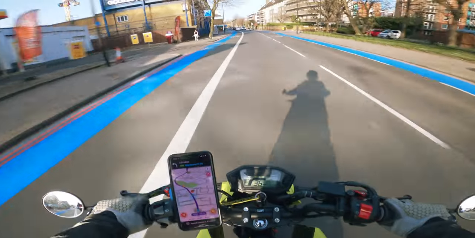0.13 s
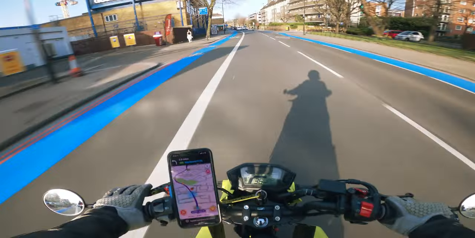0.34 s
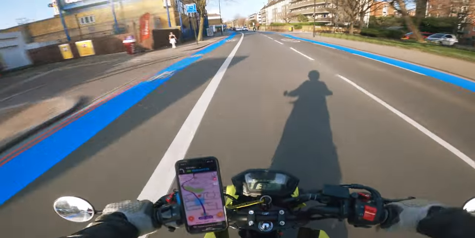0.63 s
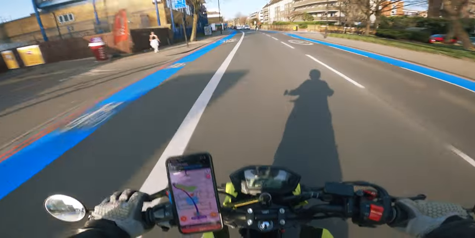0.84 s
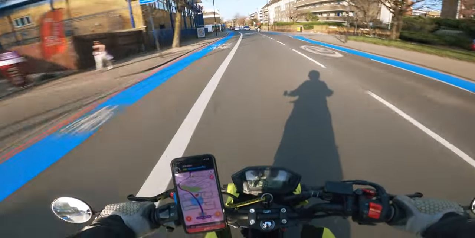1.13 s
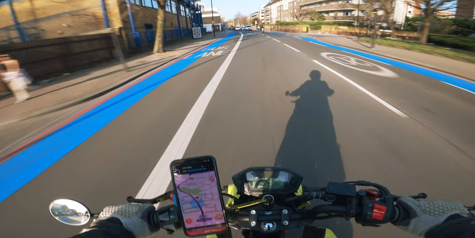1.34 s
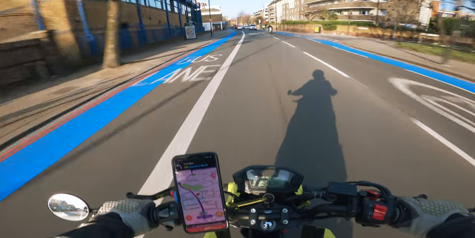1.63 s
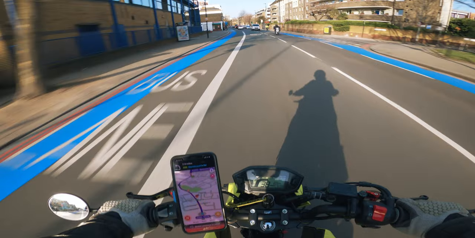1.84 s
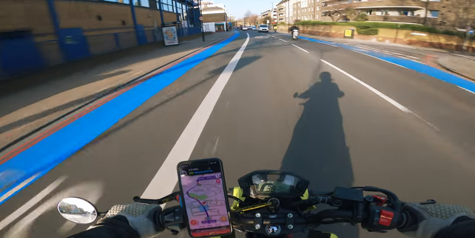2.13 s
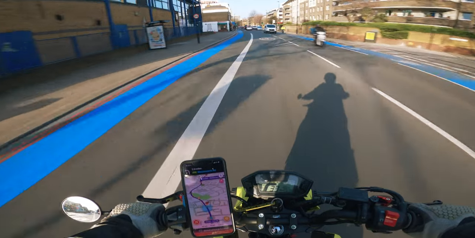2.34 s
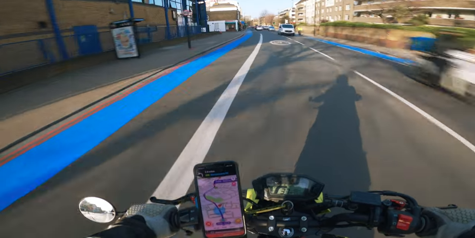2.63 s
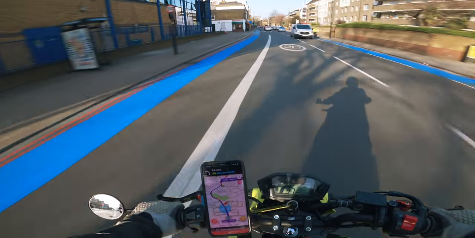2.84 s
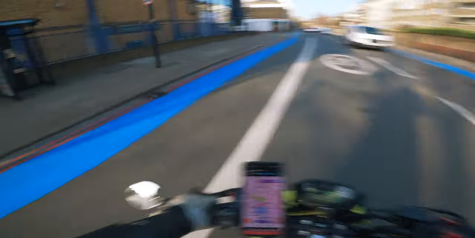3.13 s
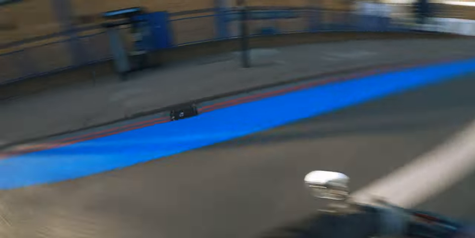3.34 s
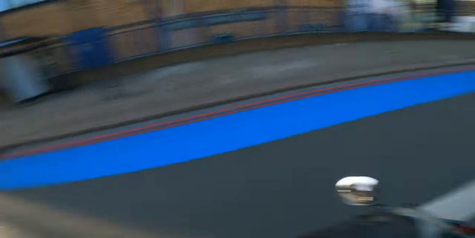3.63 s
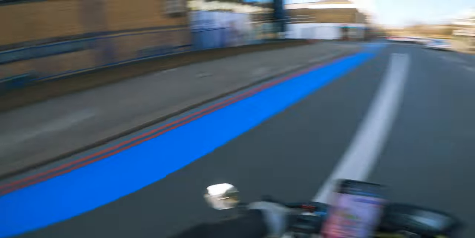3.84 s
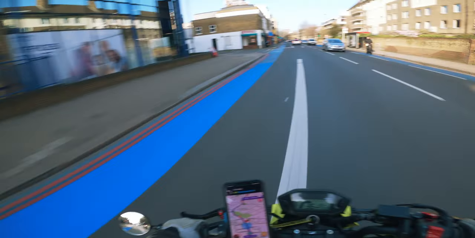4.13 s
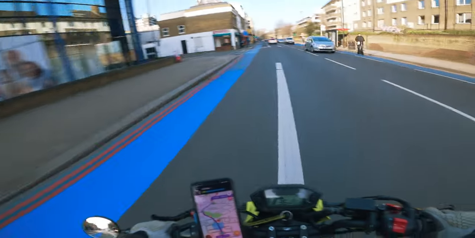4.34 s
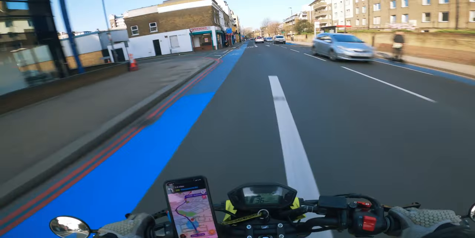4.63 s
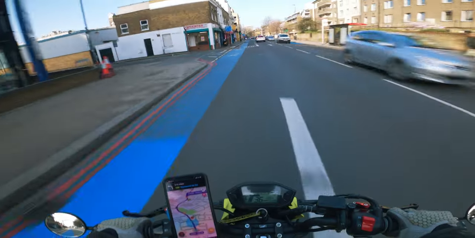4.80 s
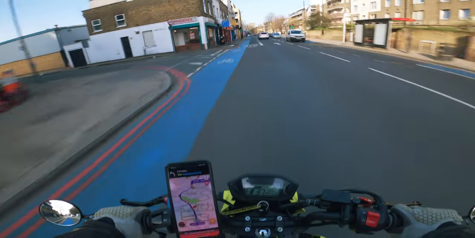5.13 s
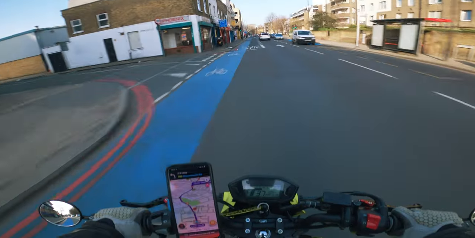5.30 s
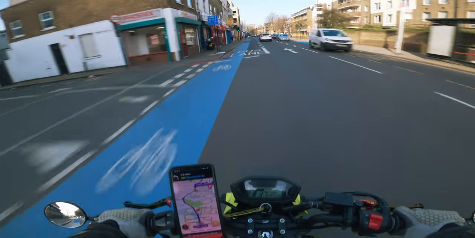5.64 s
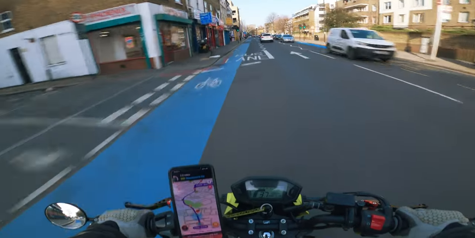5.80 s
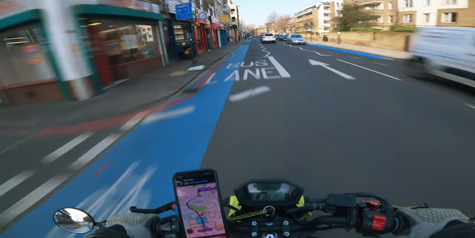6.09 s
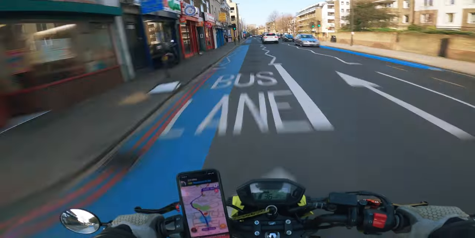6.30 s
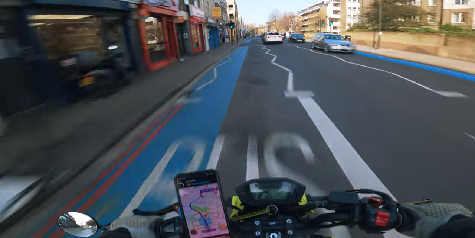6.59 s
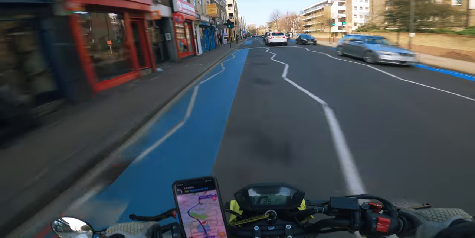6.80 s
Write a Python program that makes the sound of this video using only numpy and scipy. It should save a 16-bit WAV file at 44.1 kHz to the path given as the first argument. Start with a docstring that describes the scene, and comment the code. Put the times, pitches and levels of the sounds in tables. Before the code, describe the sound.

A small single-cylinder motorcycle barks at full throttle, changes up early, then burbles along a city street, softening into hollow thuds whenever the throttle closes.

```python
"""Small motorcycle from the saddle

A single-cylinder engine on a city street: each cycle barks with the throttle open and thuds, a little
later, with it shut; a gear change comes early. Barks and thuds are filtered pulses, gas is gated noise,
and metal ticks ring under load. A fainter, slower drone is a stack of tones; road and traffic hiss and
rumble are coloured noise, with brief squeaks and a faint whine. Two close microphone ports hear it."""
import sys
import numpy as np
from scipy import signal
from scipy.fft import rfft, irfft, next_fast_len
from scipy.io import wavfile
from scipy.ndimage import map_coordinates

SR = 44100
rng = np.random.default_rng(int(sys.argv[2]) if len(sys.argv) > 2 else 0)


def inscribe(sig):
    """Save sig as 16-bit PCM at rate SR to the path in sys.argv[1].

    A 1-D sig is mono; a 2-D sig holds one channel per row.
    Samples are clipped to [-1, 1] before scaling.
    """
    pcm = np.round(np.clip(np.atleast_2d(sig).T, -1, 1) * 32767)
    wavfile.write(sys.argv[1], SR, pcm.astype(np.int16))


N = 306936
TIME = np.arange(N) / SR
PULSE_SAMPLES = 4096
THUD_DELAY_S = .0036  # thud after bark

# Engine speed: start_s, cycle_rate_hz
ENGINE_SPEED = [(0.0, 56.56), (0.44, 59.3), (0.58, 54.52), (0.7, 53.47), (0.82, 43.98), (1.45, 45.14),
                (1.7, 45.36), (2.05, 44.87), (2.25, 43.18), (2.35, 44.12), (3.4, 41.23), (3.5, 42.71),
                (3.7, 41.5), (5.0, 42.99), (5.7, 43.27), (6.4, 42.11), (6.5, 41.04), (6.96, 41.25)]
# Engine load, 1 full throttle, 0 neutral, below 0 engine braking: start_s, load
ENGINE_LOAD = [(0, 1), (.43, .88), (.48, 0.2), (.51, -1), (.6, -.68), (.66, -0.94), (.7, 0.33), (.73, 0.54),
               (.81, 0.52), (.87, 0.55), (1.56, 0.57), (1.75, 0.3), (1.95, 0.13), (2.06, -0.24),
               (2.26, -0.32), (2.35, -0.44), (2.7, -0.44), (3.4, -0.47), (3.46, -.24), (3.6, 0.093),
               (3.76, 0.27), (3.85, 0.4), (4.2, 0.46), (5.45, .38), (5.8, 0.21), (5.93, -0.17),
               (6.46, -0.18), (6.53, -0.45), (6.67, -0.65), (6.8, -.46), (6.88, -0.57)]
# What follows the load: load, boom_db, rasp_db, rasp_t60_s, crack_db, hiss_db, rumble_db
LOAD_EFFECTS = [(-0.92, -6.5, -70, .018, -83, -45, -38), (-0.48, 1, -65.5, 0.0096, -85, -51.5, -45),
                (-0.047, 8, -73.5, 0.011, -90.5, -53, -45), (0.15, 6, -71.5, 0.016, -85, -51.5, -42.5),
                (0.17, -8.5, -72.5, 0.0097, -84.5, -51, -40), (.42, -0.5, -64.5, 0.006, -76.5, -50.5, -40),
                (.58, 2, -64.5, 0.0096, -74, -50, -39), (0.98, -1.5, -50.5, 0.021, -64.5, -42.5, -39)]


def amp(db):
    """Amplitude factor for a level in dB."""
    return 10 ** (np.asarray(db) / 20)


def unit(x):
    """Scale a signal to rms 1."""
    return x / np.sqrt(np.mean(x ** 2) + 1e-20)


def along(points, hz):
    """Read (Hz, value) points on a log frequency axis."""
    f, v = np.transpose(points)
    return np.interp(np.log(hz + 1), np.log(f + 1), v)


def curves(rows, positions):
    """Read each column after the first, which holds the times or loads, at the given positions."""
    knots, *columns = np.transpose(rows)
    return [np.interp(positions, knots, column) for column in columns]


def filtered(x, response):
    """Multiply the spectrum of x by a complex response of frequency."""
    length = next_fast_len(N + 8192)
    return irfft(rfft(x, length) * response(np.fft.rfftfreq(length, 1 / SR)), length)[..., :N]


def noise(spectrum, alike, envelope=1):
    """Stereo noise, gated and then coloured, rms 1; alike is the correlation of the two sides."""
    a, b = rng.standard_normal((2, N)) * envelope
    turn = np.arccos(np.clip(alike, 0, 1)) / 2
    common, opposed = np.cos(turn) * a, np.sin(turn) * b
    pair = np.array([common + opposed, common - opposed])
    return unit(filtered(pair, lambda hz: amp(along(spectrum, hz))))


def wander(rate_hz):
    """A smooth random curve through about rate_hz new values a second."""
    return map_coordinates(rng.standard_normal(200), [TIME * rate_hz])


def engine():
    """Combustion pulses and metal ticks, with the gas that leaves at each firing."""
    times = firings(jitter_s=.00005)
    pulses = thuds(times, size_db=.45, colour_db=.4, later_s=THUD_DELAY_S)
    return pulses + ticks(times) + gas(times)


def firings(jitter_s):
    """Times at which the crank completes a four-stroke cycle, each a little early or late."""
    cycles = np.cumsum(curves(ENGINE_SPEED, TIME)[0]) / SR + .056
    times = np.interp(np.arange(1, int(cycles[-1]) + 1), cycles, TIME)
    return np.clip(times + jitter_s * rng.standard_normal(400)[:len(times)], 0, TIME[-1])


def thuds(times, size_db, colour_db, later_s):
    """Bark and thud are two pressure pulses a cycle; the load decides which one is heard."""
    # Relative spectra of the shut-throttle thud, cruising bark and full-load bark: pitch_hz, level_db
    shut_spectrum = [(43, -37.5), (128, 1.5), (298, -9), (426, -16.5), (468, -24), (553, -21), (639, -51),
                     (681, -28.5), (809, -31), (851, -33.5), (936, -46.5), (1022, -38.5), (1362, -62),
                     (2500, -98.5)]
    cruise_spectrum = [(43, -23.5), (128, 0), (171, 1), (299, -7.5), (426, -1.5), (554, -11), (640, -27),
                       (725, -18), (768, -33), (853, -27), (938, -38), (1066, -29.5), (1365, -56),
                       (2500, -89)]
    full_spectrum = [(58, -17), (117, -1.5), (291, -7), (408, -3.5), (524, -7.5), (641, -18.5),
                     (874, -18.5), (932, -25), (990, -20), (1165, -22.5), (1223, -25), (1340, -36),
                     (1398, -45.5), (2500, -91.5)]
    # Gain of the thud's upper harmonics: start_s, level_db
    upper_gain = [(.5, 1.5), (.7, 1.5), (2.05, -5.5), (2.35, 2.5), (3.4, -0.5), (3.55, -4.5), (5.9, -4.5),
                  (6.5, -6), (6.96, -4.5)]
    upper_from_hz = 328
    boom_hz, boom_octaves = 125.8, 0.092
    cruise_load, full_load = 0.43, .85  # the bark changes from cruising to full load between these

    hz = np.fft.rfftfreq(PULSE_SAMPLES, 1 / SR)
    load = curves(ENGINE_LOAD, times)[0][:, None]
    boom = curves(LOAD_EFFECTS, load)[0] * np.exp(-(np.log2((hz + 1) / boom_hz) / boom_octaves) ** 2)
    fullness = np.clip((load - cruise_load) / (full_load - cruise_load), 0, 1)
    bark = (1 - fullness) * along(cruise_spectrum, hz) + fullness * along(full_spectrum, hz)
    upper = curves(upper_gain, times)[0][:, None] / (1 + (upper_from_hz / (hz + 1)) ** 10)
    thud = along(shut_spectrum, hz) + upper

    # Random colour is drawn every third of an octave
    bands = np.clip(3 * np.log2((hz + 1) / 60), 0, 14)
    knots = np.meshgrid(np.arange(len(times)), bands, indexing="ij")
    spectrum = 0
    for db, gain, delay in zip([bark, thud], bark_thud_gains(load), [0, later_s]):
        db = db - 10 * np.log10(np.sum(amp(db) ** 2, 1, keepdims=True))
        chance = rng.standard_normal((400, 16))[:len(times)]
        scatter_db = colour_db * map_coordinates(chance, knots, order=1)
        scatter_db = scatter_db + size_db * chance[:, -1:]  # no two burns alike
        delayed = causal(db + boom) * np.exp(-2j * np.pi * hz * delay)
        spectrum = spectrum + gain * amp(scatter_db) * delayed

    # Equal power at any engine speed
    energy = np.sqrt(SR * PULSE_SAMPLES / curves(ENGINE_SPEED, times)[0] / 2)
    start = np.floor(times * SR).astype(int)
    shift = np.exp(-2j * np.pi * hz * (times - start / SR)[:, None])  # the part of a sample left over
    pulses = -energy[:, None] * irfft(spectrum * shift)  # suction comes first
    sample = np.arange(PULSE_SAMPLES)
    fade_out = signal.windows.tukey(PULSE_SAMPLES, .5).clip(sample < PULSE_SAMPLES / 2)
    pulses = pulses * fade_out * np.clip(sample / 12, 0, 1)  # each rises softly and dies away fully
    return np.bincount((start[:, None] + sample).ravel(), pulses.ravel(), N + PULSE_SAMPLES)[:N]


def bark_thud_gains(load):
    """Gains of bark and thud: the positive and negative part of the load, rounded near zero."""
    full_db, overlap = -18, 0.26  # pulse level near load 1; load range where both sound
    size = np.sqrt(load ** 2 + overlap ** 2)
    return amp(full_db) * (size + load) / 2, amp(full_db) * (size - load) / 2


def causal(db):
    """Minimum-phase spectra for rows of gains, so that each pulse begins at its firing."""
    hz = np.fft.rfftfreq(PULSE_SAMPLES, 1 / SR)
    # Deep bass falls away below 45 Hz, as through a microphone's high-pass
    db = db + 40 * np.log2(np.clip(hz / 45, 1e-3, 1))
    cepstrum = irfft(np.maximum(db, -110) * np.log(10) / 20)
    cepstrum[:, 1:PULSE_SAMPLES // 2] *= 2
    cepstrum[:, PULSE_SAMPLES // 2 + 1:] = 0
    return np.exp(rfft(cepstrum))


def gas(times):
    """Rasp and crack of escaping gas: noise that bursts and dies after each firing."""
    # Relative noise spectra of the rasp and the crack: pitch_hz, level_db (per Hz)
    rasp_spectrum = [(900, -65.5), (1300, 1.5), (1800, -3), (2400, -4), (3000, -10.5), (3700, -19),
                     (4500, -21.5), (6000, -67)]
    crack_spectrum = [(2060, -26), (3500, -4), (4410, -11), (7140, -14), (8010, -12.5), (11300, -22.5),
                      (13400, -31), (15000, -29)]
    _, rasp_db, rasp_t60, crack_db, *_ = curves(LOAD_EFFECTS, curves(ENGINE_LOAD, TIME)[0])
    # The gas leaves with the louder pulse
    times = times + THUD_DELAY_S * (curves(ENGINE_LOAD, times)[0] < 0)
    # A small constant flow remains between the firings
    rasp_envelope = puffs(times, np.abs(rasp_t60), scatter_db=0.6) + .09
    crack_envelope = puffs(times, t60=0.014, scatter_db=0.5) + 0.014
    rasp = noise(rasp_spectrum, 0.28, rasp_envelope)
    crack = noise(crack_spectrum, 0.8, crack_envelope)
    return amp(rasp_db) * rasp + amp(crack_db) * crack


def puffs(times, t60, scatter_db):
    """A dying envelope after every firing, of new height each time; t60 in seconds."""
    last = np.clip(np.searchsorted(times, TIME) - 1, 0, None)
    height = amp(scatter_db * rng.standard_normal(400))
    return height[last] * amp(-60 * np.abs(TIME - times[last]) / t60)


def ticks(times):
    """Metal rings briefly at each firing under load: a few decaying sines with a soft onset."""
    # Metal modes: pitch_hz, level_db (relative), t60_s
    metal_modes = [(2220, -4, 0.022), (2933, -4.5, 0.022), (3630, -8.5, 0.016), (4050, -11.5, .02)]
    level_db, top_load = -49, 0.39  # level per unit load; no growth above top_load
    t = np.arange(2048) / SR
    chance = rng.standard_normal((400, 2 * len(metal_modes)))[:len(times)]
    ring = 0
    for k, (hz, db, t60) in enumerate(metal_modes):
        decay = amp(db + 2.5 * chance[:, [k]] - 60 * t / t60)
        ring = ring + decay * np.sin(2 * np.pi * hz * t + 0.9 * chance[:, [-1 - k]])
    ring = ring * (1 - np.exp(-t / 0.00064))
    ring = ring * amp(level_db) * np.clip(curves(ENGINE_LOAD, times)[0], 0, top_load)[:, None]
    where = np.round(times * SR).astype(int)[:, None] + np.arange(len(t))
    return np.bincount(where.ravel(), ring.ravel(), N + len(t) + 1)[:N]


def drone():
    """Slightly unsteady tones at multiples of one slow rate."""
    # Course of the drone: start_s, rate_hz, level_db (before each multiple's own level)
    drone_course = [(0, 37.43, -31), (.33, 38.4, -29.5), (.6, 35, -39), (.9, 30.01, -35),
                    (1.6, 31.02, -35.5), (2.5, 30.78, -39.5), (3.6, 29.91, -36.5), (4.4, 29.12, -42.5),
                    (5.4, 31.12, -35.5), (6.96, 30.02, -36.5)]
    # Multiples of the rate that sound: multiple
    drone_multiples = (2, 3, 5, 6)
    # Their levels over the course: level_db
    multiple_levels = (-17.5, -2.5, 2, -3)
    rate, level_db = curves(drone_course, TIME)
    phase = 2 * np.pi * np.cumsum(rate) / SR
    out = np.zeros(N)
    for k, db in zip(drone_multiples, multiple_levels):
        level = amp(level_db + db + 2.5 * wander(4))
        out += level * np.sin(k * phase + 0.45 * wander(4))
    return out


def squeaks():
    """Short, high squeaks: tones blurred by a randomly drifting phase."""
    # Squeaks: start_s, length_s, pitch_hz, level_db (peak)
    squeak_list = [(2.824, 0.018, 9160, -77.5), (2.889, .014, 9160, -67), (2.89, 0.032, 8820, -69.5)]
    out = np.zeros(N)
    for start, length, hz, db in squeak_list:
        swell = np.sin(np.pi * np.clip((TIME - start) / length, 0, 1)) ** 2
        drift = np.cumsum(rng.standard_normal(N)) * .06
        out += amp(db) * swell * np.sin(2 * np.pi * hz * TIME + drift)
    return out


def street():
    """Road and traffic: noise hiss over a lumpy rumble, both following the load, with swells and a whine."""
    # Relative noise spectra of hiss and rumble: pitch_hz, level_db (per Hz)
    hiss_spectrum = [(300, -23), (500, -1), (800, -8), (1200, -12.5), (1700, -19.5), (2500, -27.5),
                     (3300, -37.5), (4500, -45), (8000, -52.5), (11000, -59.5), (15500, -72)]
    rumble_spectrum = [(20, -120), (30, -10), (60, -9), (170, 3.5), (300, -1.5), (600, -11), (1000, -31.5),
                       (1500, -120)]
    *_, hiss_db, rumble_db = curves(LOAD_EFFECTS, curves(ENGINE_LOAD, TIME)[0])
    hiss = amp(hiss_db + wander(7)) * noise(hiss_spectrum, 0.33)
    rumble = amp(rumble_db) * noise(rumble_spectrum, 0.92, amp(4 * wander(12)))
    return hiss + rumble + swells() + whine()


def swells():
    """Brief swells of hiss: band noise that rises and falls smoothly."""
    # Swells: middle_s, length_s, centre_hz, level_db (at the middle)
    swell_list = [(0.767, .12, 2400, -61.5), (2.78, .4, 3000, -70), (3.554, .35, 1250, -60),
                  (3.731, 0.13, 4000, -75), (6.2, .7, 1100, -61)]
    half_width_octaves = .35  # 9 dB down there
    out = 0
    for middle, length, hz, db in swell_list:
        band = [(hz * 2 ** (k * half_width_octaves), -9 * k * k) for k in range(-3, 4)]
        rise_and_fall = np.cos(np.pi * np.clip((TIME - middle) / length, -.5, .5)) ** 2
        out = out + amp(db) * rise_and_fall * noise(band, .4)
    return out


def whine():
    """A faint tone, wandering in pitch, that comes and goes."""
    centre_hz, centre_db = 1328, -71.5
    phase = 2 * np.pi * np.cumsum(centre_hz + 8 * wander(10)) / SR
    return amp(centre_db + 4.3 * wander(8)) * np.sin(phase)


def scene():
    """The motorcycle close by, over the drone, the street and the squeaks."""
    return engine() + drone() + street() + squeaks()


def record(dry):
    """The two microphone ports differ in level and arrival time; nothing passes above the band limit."""
    # Left port over right: pitch_hz, level_db
    left_over_right = [(43, -1.5), (170, 5.5), (300, 0), (470, 4.5), (800, 7), (1050, 8.5), (1500, 2),
                       (2600, -4), (5300, -1.5), (7200, -6.5), (8600, -4.5)]
    # Phase by which the left port leads, besides its lag: pitch_hz, lead_rad
    left_lead = [(220, .1), (400, .65), (900, 1.1), (1170, -.3), (1500, .3), (4300, .5), (5200, -1),
                 (7300, 3.1), (11500, 10.4)]
    left_lag_s, top_hz = .00034, 15700
    dry = dry / (1 + np.abs(dry / .6) ** 4) ** (1 / 4)  # the loudest peaks round off
    half = np.array([[.5], [-.5]])  # each port takes half of the difference

    def ports(hz):
        lead = along(left_lead, hz) - 2 * np.pi * hz * left_lag_s
        return amp(half * along(left_over_right, hz)) * np.exp(1j * half * lead) * (hz < top_hz)

    return filtered(dry, ports)


dry = scene()
out = record(dry)
inscribe(out)
```